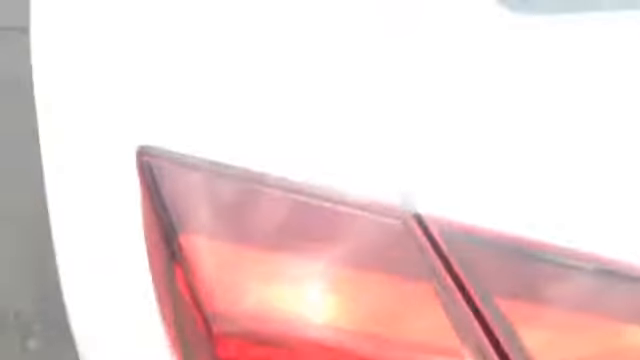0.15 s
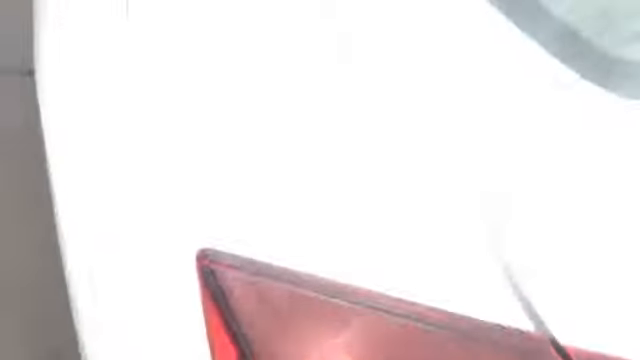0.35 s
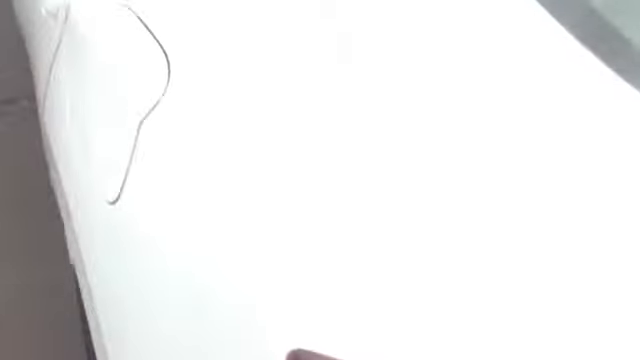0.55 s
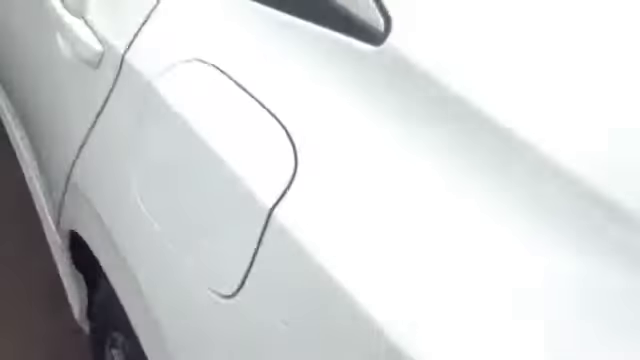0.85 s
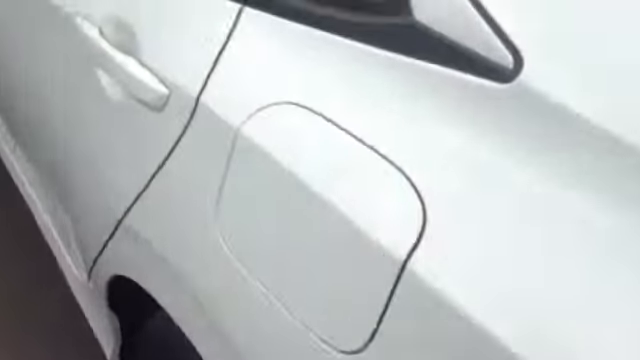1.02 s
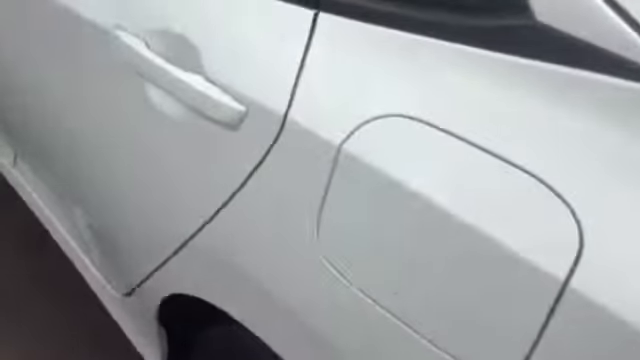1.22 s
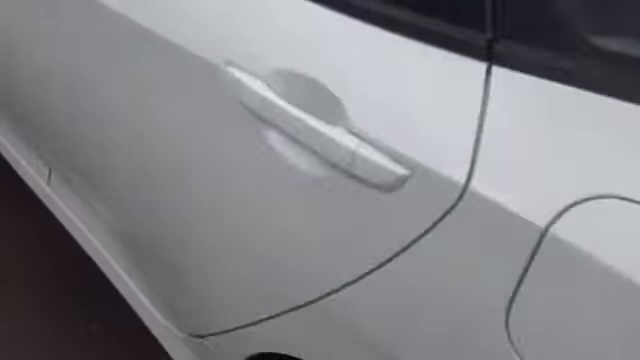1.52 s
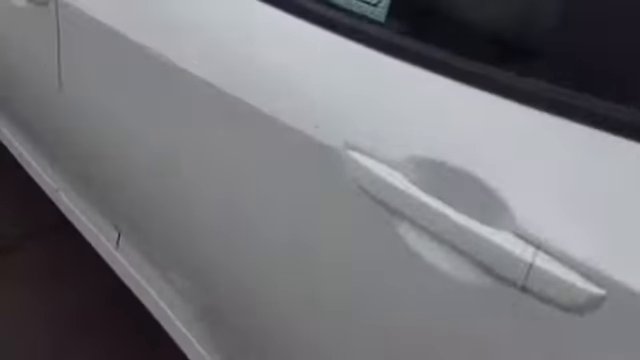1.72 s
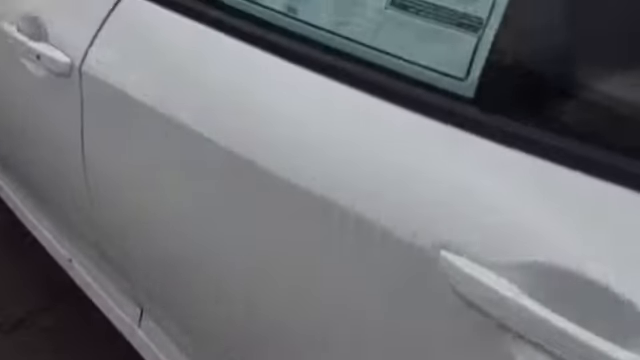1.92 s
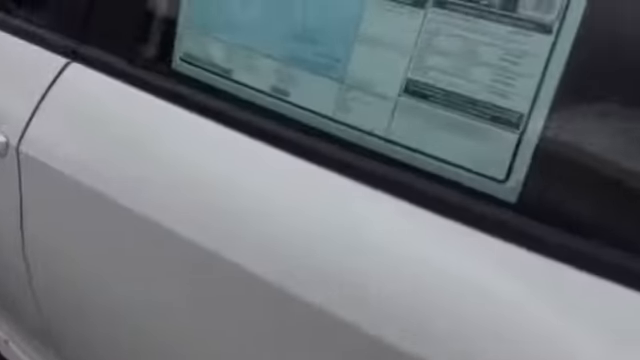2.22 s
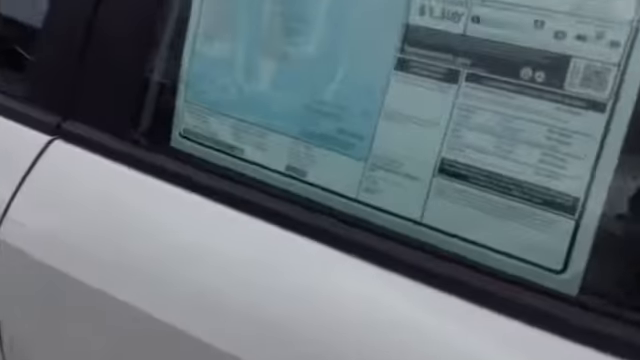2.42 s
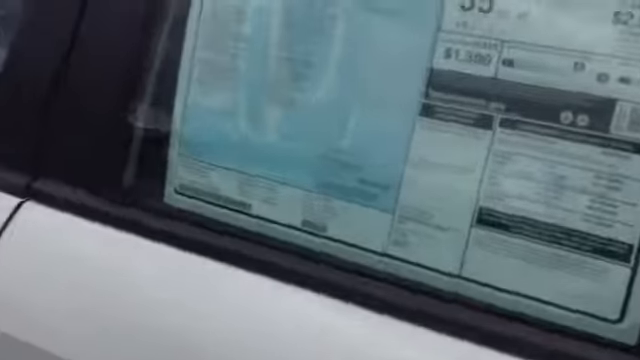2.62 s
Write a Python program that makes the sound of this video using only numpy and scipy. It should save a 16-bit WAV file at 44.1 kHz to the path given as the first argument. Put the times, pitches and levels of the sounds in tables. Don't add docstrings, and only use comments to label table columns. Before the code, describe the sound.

At about 0.06 to 0.2 s a car trunk lid slams loudly: rapid latch clacks, a hollow body boom, a sagging hoot of trapped air and dull outdoor echoes. Faint heel and grit ticks follow from 0.44 s, tiny squeaks near 0.93 and 1.12, cloth rustles, busier steps around 2.3, then a rough jerky sole scuff from 2.55 to the end. Distant traffic and hiss; small bass-light microphone.

```python
import sys
import numpy as np
from scipy import signal
from scipy.fft import rfft, irfft
from scipy.io import wavfile

SR = 44100
rng = np.random.default_rng(int(sys.argv[2]) if len(sys.argv) > 2 else 0)


def amplitude_ratio(level_db):
    exponent = np.asarray(level_db, float) / 20
    return 10 ** exponent


def master_out(mix):
    frames = np.transpose(np.atleast_2d(mix))
    ceiling = np.clip(frames, -1, 1)
    pcm = np.round(ceiling * 32767).astype(np.int16)
    wavfile.write(sys.argv[1], SR, pcm)


N = 121275


def clock():
    return np.arange(N) / SR


def rms_one(x):
    return x / np.sqrt(np.mean(x ** 2) + 1e-20)


def band(x, low_hz, high_hz):
    return signal.sosfilt(signal.butter(2, [low_hz, min(high_hz, 19000)], "band", fs=SR, output="sos"), x)


def ring(clicks, hz, t60_s):
    radius = amplitude_ratio(-60 / (t60_s * SR))
    angle = 2 * np.pi * hz / SR
    feedback = [1, -2 * radius * np.cos(angle), radius * radius]
    return signal.lfilter([0, np.sin(angle)], feedback, clicks + 1e-18)


def dying(start_s, t60_s):
    t = clock() - start_s
    attack = (t >= 0) * np.minimum(t / 0.0005, 1)
    return attack * amplitude_ratio(-60 * np.clip(t, 0, 1) / t60_s)


def bump(centre_s, half_s):
    return np.exp(-((clock() - centre_s) / half_s) ** 2)


def drift(rate_hz):
    radius = np.exp(-80 * np.pi * rate_hz / SR)
    noise = rng.standard_normal(N // 40 + 2002)
    slow = signal.lfilter([1], [1, -2 * radius, radius * radius], noise)[2000:]
    return np.interp(np.arange(N) / 40, np.arange(len(slow)), rms_one(slow))


def colour(x, spectrum):
    hz, db = np.transpose(spectrum)
    log_hz = np.log(np.fft.rfftfreq(len(x), 1 / SR) + 1)
    return irfft(rfft(x) * amplitude_ratio(np.interp(log_hz, np.log(hz), db)), len(x))


def grains(per_s, spread_db):
    size = amplitude_ratio(spread_db * np.minimum(rng.exponential(1, N), 4)) * rng.choice([-1, 1], N)
    return rms_one(size * (rng.random(N) < per_s / SR))


# pitch_hz [Hz], level_db [dB per Hz]
TRAFFIC_COLOUR = [(24, -35), (40, -23), (102, -14), (182, -2), (265, -5.5), (321, -2.5), (565, -13.5),
                  (795, -5.5), (1400, -15), (1820, -64), (3080, -120)]
# pitch_hz [Hz], level_db [dB per Hz]
AIR_COLOUR = [(600, -7.5), (1100, -18), (1700, -5), (3700, -18), (7500, -26.5), (11000, -24.5),
              (15000, -28), (16000, -45)]
# time_s [s], level_db [dB]
TRAFFIC_SWELL = [(0, 0.5), (.4, .5), (.8, .5), (1.2, -1), (1.9, 0), (2.3, 0), (2.75, 2)]


def background():
    traffic_db, air_db = -52.5, -59
    patchy = np.zeros(N)
    for low_hz in 40 * 2 ** np.arange(6):
        patchy += band(rng.standard_normal(N), low_hz, 2 * low_hz) * amplitude_ratio(0.83 * drift(5))
    traffic = amplitude_ratio(traffic_db) * rms_one(colour(patchy, TRAFFIC_COLOUR))
    hiss = rms_one(colour(rng.standard_normal(N), AIR_COLOUR)) * amplitude_ratio(0.28 * drift(7.5))
    swell = amplitude_ratio(np.interp(clock(), *np.transpose(TRAFFIC_SWELL)))
    return (traffic + amplitude_ratio(air_db) * hiss) * swell


# centre_s [s], half_length_s [s], level_db [dB], centre_hz [Hz]
RUSTLES = [(.95, .05, -66, 12500), (1.066, .13, -64, 3400), (1.1, .07, -70, 12000),
           (1.676, .13, -71.5, 5500), (1.75, .2, -69, 12000), (1.833, .06, -68.5, 4030),
           (2.342, .03, -61, 13000), (2.364, .095, -57, 1940)]


def cloth_rustles():
    speckle = grains(5000, 1.9) * amplitude_ratio(0.72 * drift(46))
    out = np.zeros(N)
    for centre_s, half_s, db, hz in RUSTLES:
        out += amplitude_ratio(db) * bump(centre_s, half_s) * rms_one(band(speckle, hz / 1.54, hz * 1.48))
    return out


# start_s [s], level_db [dB], centre_hz [Hz], t60_s [s]
BRUSHES = [(.436, -60, 6500, .04), (.437, -52, 1500, .03), (.52, -68, 6500, .06), (.757, -54, 1800, .03),
           (.891, -62, 11000, .02), (.892, -54, 2970, .02), (1.013, -48, 1270, .06),
           (1.0145, -54, 4500, .02), (1.015, -56, 10500, .02), (1.04, -54, 1800, .03),
           (1.063, -57, 4300, .025), (1.072, -60, 5500, .015), (1.1025, -51, 14700, .045),
           (1.1035, -56, 11800, .035), (1.123, -60, 10000, .04), (1.805, -55, 2500, .04),
           (1.868, -57, 5000, .022), (1.876, -52, 8000, .012), (1.885, -56, 4500, .07),
           (1.889, -53, 4800, .012), (1.947, -62, 5500, .012), (2.14, -63, 8500, .015),
           (2.309, -51, 3500, .05), (2.3095, -54, 13500, .045), (2.312, -48, 600, .07),
           (2.3295, -52, 4200, .04), (2.33, -47, 463, .06), (2.331, -55, 9000, .015),
           (2.345, -54, 190, .18), (2.357, -49, 4800, .06), (2.3575, -49, 14000, .065),
           (2.3615, -54, 9000, .02), (2.406, -61, 6500, .25), (2.407, -52, 3000, .02),
           (2.4075, -56, 13500, .14), (2.524, -57.5, 2500, .068)]


def grit_brushes():
    grit = grains(6000, 0.83)
    out = np.zeros(N)
    for start_s, db, hz, t60_s in BRUSHES:
        out += amplitude_ratio(db) * dying(start_s, t60_s) * rms_one(band(grit, hz / 1.31, hz * 1.42))
    return out


# start_s [s], length_s [s], from_hz [Hz], to_hz [Hz], level_db [dB]
SQUEAKS = [
    (.924, .02, 11000, 9700, -66),
    (.926, .012, 15100, 14300, -67),
    (.933, .026, 11300, 13100, -61.5),
    (1.121, .01, 8500, 11000, -64),
]


def squeaks():
    out = np.zeros(N)
    waver_hz = 250 * drift(160)
    for start_s, length_s, from_hz, to_hz, db in SQUEAKS:
        progress = np.clip((clock() - start_s) / length_s, 0, 1)
        hz = from_hz + (to_hz - from_hz) * np.sin(progress * np.pi / 2) + waver_hz
        out += amplitude_ratio(db) * np.sin(np.pi * progress) * np.sin(2 * np.pi * np.cumsum(hz) / SR)
    return out


# start_s [s], peak_db [dB], pitch_hz [Hz], length [cycles], edge_db [dB]
KNOCKS = [(0.436, -34.5, 560, 2.2, -4), (.515, -41, 710, 1.5, -8), (.7575, -32.5, 666, 2.0, -7),
          (0.9514, -35.5, 620, 2.5, -3.5), (1.808, -38, 1330, 2.8, -11), (1.877, -30.5, 663, 1.25, 4),
          (2.121, -34, 600, 4.3, -9), (2.3112, -37, 620, 2, -6), (2.3145, -38, 520, 3, -8),
          (2.3305, -36, 560, 2, -5), (2.335, -38, 450, 3, -10), (2.357, -37, 650, 2.5, -4.5),
          (2.408, -39, 900, 1.5, -3), (2.523, -38, 1460, 4.2, -10)]


def knocks():
    out = np.zeros(N)
    for start_s, peak_db, hz, cycles, edge_db in KNOCKS:
        click = np.zeros(N)
        click[int(start_s * SR)] = -amplitude_ratio(peak_db)
        edge = ring(click, 1.79 * hz, 1.7 * cycles / hz) + ring(click, 3.27 * hz, 0.89 * cycles / hz)
        out += ring(click, hz, 3.3 * cycles / hz) + amplitude_ratio(edge_db) * edge
    return band(out, 420, 4450)


# start_s [s], level_db [dB], pitch_hz [Hz]
SLIPS = [(2.641, -38, 380), (2.652, -34, 334), (2.662, -32, 387), (2.673, -34, 400), (2.686, -31.5, 320),
         (2.701, -33, 440), (2.737, -43, 330)]


def shoe_drag():
    slips = np.zeros(N)
    for start_s, db, hz in SLIPS:
        jerk = 1.0 * (np.arange(N) == int(start_s * SR))
        slips += amplitude_ratio(db) * ring(jerk, hz, 0.05)
    drag_db, drag_hz, width_hz = -46, 400, 250
    rumble = rms_one(band(grains(850, 2.4), drag_hz - width_hz / 2, drag_hz + width_hz))
    return band(slips, 195, 740) + amplitude_ratio(drag_db) * bump(2.68, 0.044) * rumble


# time_s [s], level_db [dB]
SCUFF_PRESSURE = [(2.5, -76), (2.526, -64), (2.534, -66), (2.548, -55.5), (2.664, -42.5), (2.75, -42.5)]
# pitch_hz [Hz], level_db [dB per Hz]
SCUFF_COLOUR = [(350, -16), (600, -19), (2300, -4.5), (5000, -9.5), (7800, -18.5), (9800, -10.5),
                (12500, -11.5), (15500, -21)]


def sole_scuff():
    echo_ms, echo_share, echo_hz = 0.407, 0.7, 8500
    ring_hz, ring_db = 2150, -14
    notch_hz, notch_width_hz = 13450, 300
    brightens = 0.45
    grit = colour(grains(10000, 2.8), SCUFF_COLOUR)
    echo = np.roll(colour(grit, [(echo_hz / 2, -14), (echo_hz, 0)]), round(echo_ms * SR / 1000))
    grit = rms_one(grit + echo_share * echo)
    grit = grit + amplitude_ratio(ring_db) * rms_one(ring(grains(3000, 2.6), ring_hz, 0.02))
    grit = signal.lfilter(*signal.iirnotch(notch_hz, notch_hz / notch_width_hz, SR), grit)

    t = clock()
    time_s, db = np.transpose(SCUFF_PRESSURE)
    dull = signal.sosfiltfilt(signal.butter(2, 6000, fs=SR, output="sos"), grit)
    brightness = amplitude_ratio(brightens * (np.interp(t, time_s, db) - db.max()))
    pressure = amplitude_ratio(np.interp(t, time_s, db, left=-120) + 0.62 * drift(40))
    return pressure * (dull + (grit - dull) * brightness)


def yard(slam):
    yard_db, t60_s = -23, 0.24
    tail = band(grains(6000, 0.99), 250, 1900) * dying(0.0116, t60_s)
    tail = tail / np.sqrt(np.sum(tail ** 2))
    return amplitude_ratio(yard_db) * signal.fftconvolve(slam, tail[:SR // 2])[:N]


def trapped_air():
    start_s, rise_s, t60_s, level_db = 0.1105, 0.005, 0.13, -10.5
    from_hz, to_hz, sag_s = 305, 180, 0.042
    t = np.clip(clock() - start_s, 0, 1)
    hz = to_hz + (from_hz - to_hz) * np.exp(-(t / sag_s) ** 2)
    swell = (1 - np.exp(-t / rise_s)) * dying(start_s, t60_s) * amplitude_ratio(2.0 * drift(36))
    return amplitude_ratio(level_db) * swell * np.sin(2 * np.pi * np.cumsum(hz * (t > 0)) / SR)


# time_s [s], level_db [dB], softness_ms [ms]
LANDINGS = [(0.064, -38.5, 0.85), (.081, -26, 0.56), (.098, -25, 0.42), (.111, -18, 0.5), (.119, -20, 0.52),
            (.134, -21.5, 0.49), (.150, -24.5, 0.67), (.177, -27.5, 1), (0.213, -32, 2)]
# pitch_hz [Hz], level_db [dB], t60_s [s]
BODY_MODES = [(86.3, -15.5, 0.28), (125.5, -11.5, 0.16), (139, -13, 0.224), (167, -11.5, 0.34),
              (207.7, -4, 0.21), (234, -1, 0.13), (278, -3.5, 0.071), (344.6, 0.5, 0.087),
              (421.2, -10, 0.18), (477.5, -14, 0.15), (534, -9, 0.14), (598, -14, 0.18), (750, -21, 0.11),
              (1070, -14, 0.05)]


def body():
    t = clock()[:SR]
    uneven_db = rng.normal(0, 3.2, (len(LANDINGS), len(BODY_MODES)))
    pushes = []
    for time_s, db, soft_ms in LANDINGS:
        push = np.exp(-((t - time_s - 0.002) * 2000 / soft_ms) ** 2)
        pushes.append(amplitude_ratio(db) * push / (soft_ms * SR / 1128))
    pushes = np.array(pushes)
    out = np.zeros(N)
    for k, (hz, db, t60_s) in enumerate(BODY_MODES):
        force = amplitude_ratio(db + uneven_db[:, k]) @ pushes
        out[:SR] += ring(force, hz, t60_s) * (-1) ** k
    return out


# start_s [s], level_db [dB], treble_db [dB], chatter_t60_s [s]
CONTACTS = [(0.0598, -44, -26, 0.031), (0.066, -38.5, -19, 0.049), (0.0798, -23, -30, 0.095),
            (0.0843, -25, -6.5, 0.098), (0.097, -19, -17, 0.13), (0.103, -31, -11, 0.11),
            (.111, -16, -10, 0.087), (.121, -28.5, -3, 0.08), (0.13, -29, -1.5, 0.13),
            (0.141, -23.5, 3, 0.047), (.152, -35, -2, 0.065)]
# start_s [s], peak_db [dB]
TICKS = [(0.0634, -31), (0.0682, -28.5), (0.0818, -14), (.085, -17.5), (.0874, -11), (0.0923, -16.5),
         (.0952, -18), (.0973, -7), (0.1004, -8), (0.1037, -7.5), (0.1053, -10), (.108, -14),
         (.1109, -11.5), (.1133, -8), (.1178, -18), (.1202, -17), (.1226, -24.5), (.131, -17.5),
         (.1342, -20), (.1416, -18.5), (0.1459, -15), (0.1479, -18), (.152, -26), (0.1559, -23),
         (.162, -36)]
# pitch_hz [Hz], level_db [dB]
METAL_MODES = [(810, -1), (1165, 1.5), (1505, 1.5), (1660, 0), (1890, -1.5), (2170, 2), (2255, -1),
               (2590, 2), (2880, -6), (3200, -6), (4150, -5), (4920, -12), (5850, -9), (567, -4.5)]
# pitch_hz [Hz], level_db [dB per Hz]
CHATTER_COLOUR = [(240, -25), (400, -7.5), (1490, -1.5), (2370, -7.5), (2620, -3), (2970, -8.5), (5030, -8),
                  (8000, -26.5), (10400, -86), (17600, -120)]


def latch():
    chatter_per_s, chatter_spread_db = 6000, 3
    metal_db, metal_ring_s, ring_cycles = -8, 0.042, 40.5
    tick_db, crack_db, crack_s = -13, -3.5, 0.0046
    rattle_db, hiss_db = -4, -9
    force_power, treble_power = np.zeros(N), np.zeros(N)
    for start_s, db, treble_db, t60_s in CONTACTS:
        fall = dying(start_s, t60_s)
        force_power += (amplitude_ratio(db) * fall) ** 2
        treble_power += (amplitude_ratio(db + treble_db) * fall) ** 2
    force, treble = np.sqrt(force_power), np.sqrt(treble_power)

    tick_s, peak_db = np.transpose(TICKS)
    uneven_db = rng.normal(0, 2.8, (len(TICKS), len(METAL_MODES)))
    modes = np.zeros(N)
    for k, (hz, db) in enumerate(METAL_MODES):
        clicks = amplitude_ratio(metal_db - 18.5) * force * grains(chatter_per_s / 4, chatter_spread_db)
        clicks[(tick_s * SR).astype(int)] += amplitude_ratio(peak_db + tick_db + uneven_db[:, k]) * (-1) ** k
        modes += amplitude_ratio(db) * ring(clicks, hz, min(metal_ring_s, ring_cycles / hz))

    for start_s, db in TICKS:
        force = force + amplitude_ratio(db + crack_db) * dying(start_s, crack_s)
    chatter = rms_one(colour(grains(chatter_per_s, chatter_spread_db), CHATTER_COLOUR))
    hiss = rms_one(band(grains(7000, 1.3), 7500, 15700))
    return modes + amplitude_ratio(rattle_db) * force * chatter + amplitude_ratio(hiss_db) * treble * hiss


def scene():
    walker = cloth_rustles() + grit_brushes() + squeaks() + knocks() + shoe_drag() + sole_scuff()
    slam = body() + trapped_air() + latch()
    return (background() + walker + slam + yard(slam))[None]


def low_pass(x):
    return signal.sosfilt(signal.butter(12, 16280, fs=SR, output="sos"), x)


def record(dry):
    ceiling, bass_cut_hz, top_hz = 0.75, 74, 15330
    rounded = ceiling * np.tanh(dry / ceiling)
    thin = signal.sosfilt(signal.butter(2, bass_cut_hz, "high", fs=SR, output="sos"), rounded)
    finished = signal.sosfilt(signal.ellip(12, 0.5, 60, top_hz, fs=SR, output="sos"), thin)
    return low_pass(finished)


dry = scene()
out = record(dry)
master_out(out)
```